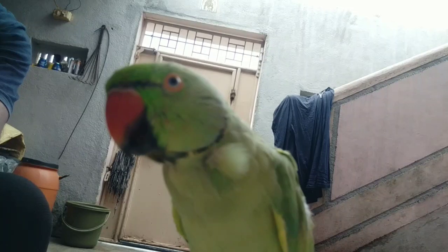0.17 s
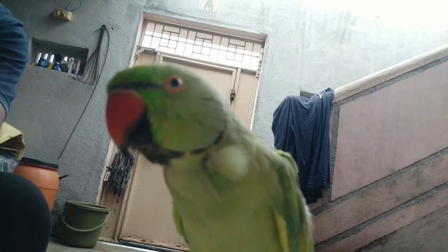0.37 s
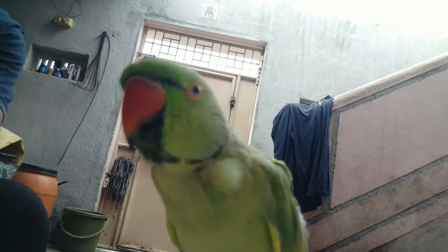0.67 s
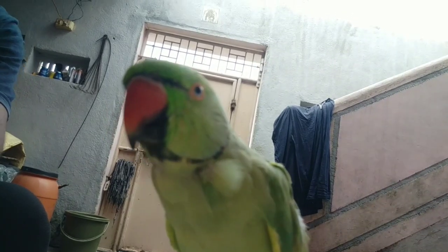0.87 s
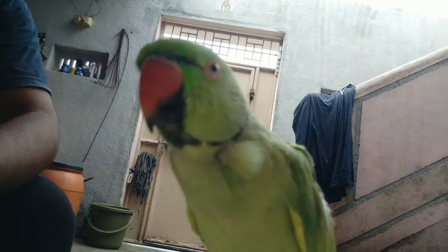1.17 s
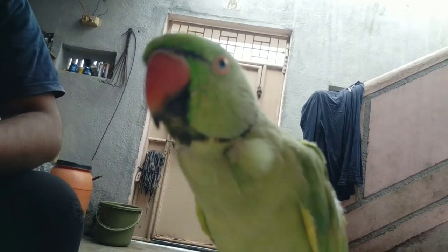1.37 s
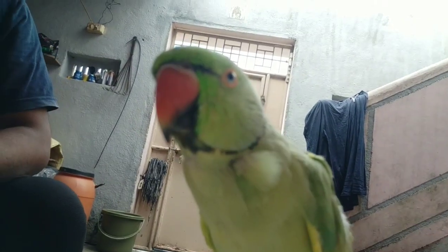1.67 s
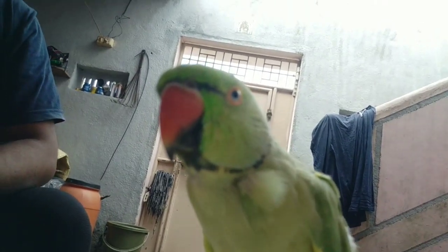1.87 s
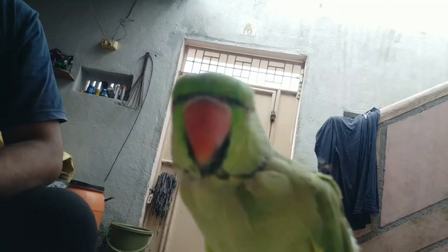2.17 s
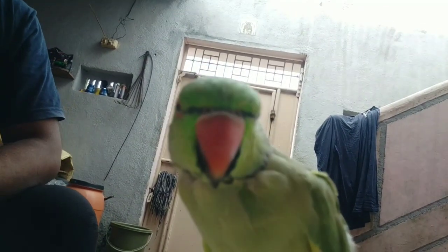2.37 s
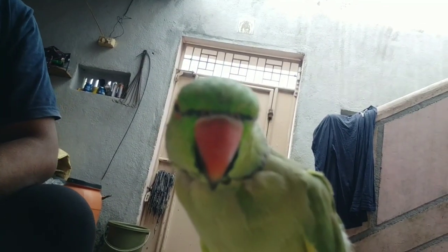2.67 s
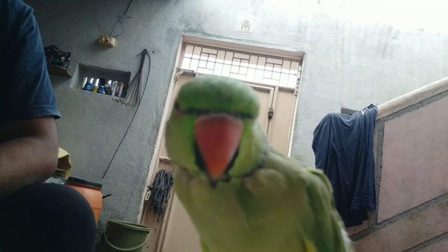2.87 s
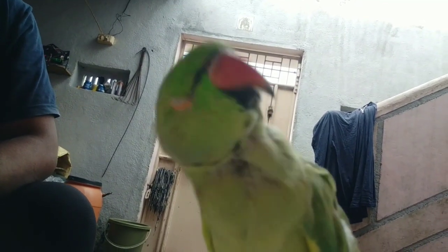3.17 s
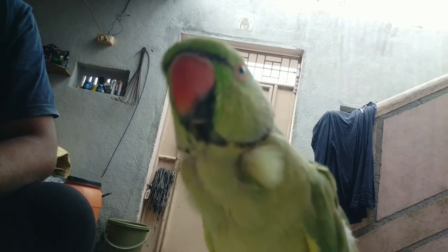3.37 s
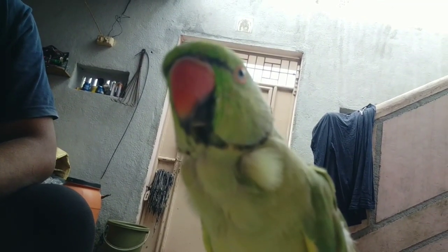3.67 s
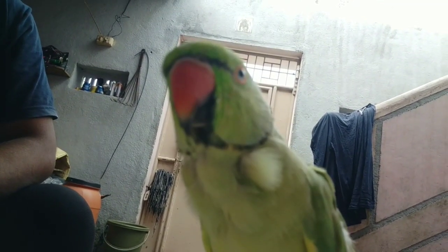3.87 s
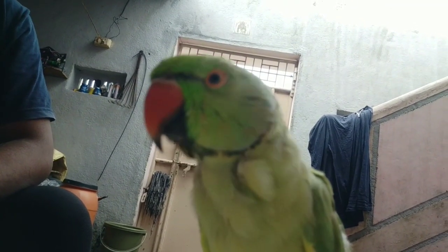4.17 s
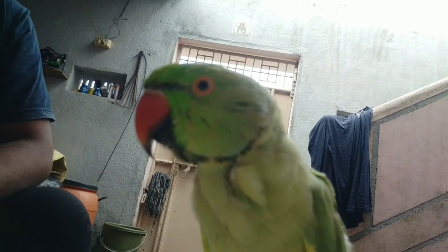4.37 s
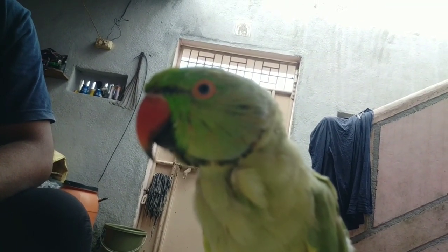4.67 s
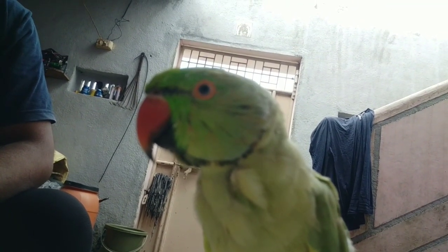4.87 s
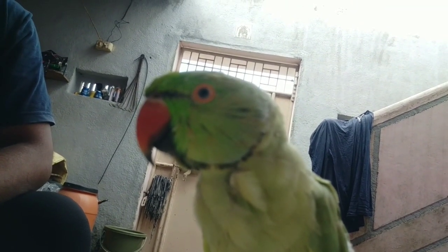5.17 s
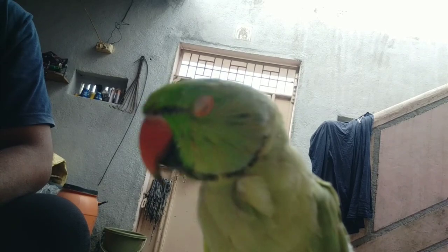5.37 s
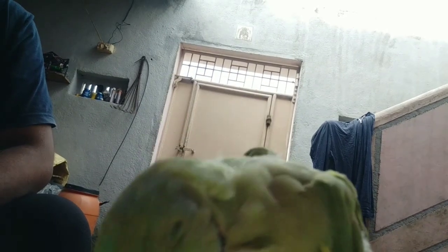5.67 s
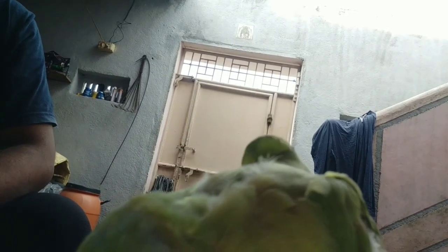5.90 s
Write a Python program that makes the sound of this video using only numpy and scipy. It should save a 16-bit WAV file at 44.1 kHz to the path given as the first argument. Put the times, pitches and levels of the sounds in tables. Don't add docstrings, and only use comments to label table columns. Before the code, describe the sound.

A parakeet very near a stereo phone microphone is caught mid-peep, then gives a dipping whistle, a small beak click, a loud rising whistle and a falling one, all within a second and a half. Airy puffs and short wall echoes surround them. Afterwards the walled yard is quiet: faint echoing sparrow chirps, slight rustling of cloth and feathers, soft low wind bumps, a far motor hum and distant traffic under thin hiss.

```python
import sys
import numpy as np
from scipy import signal
from scipy.fft import rfft, irfft
from scipy.io import wavfile
from scipy.ndimage import uniform_filter1d

SR = 44100
rng = np.random.default_rng(int(sys.argv[2]) if len(sys.argv) > 2 else 0)


def generate_wav(sig):
    pcm = np.round(np.clip(np.atleast_2d(sig).T, -1, 1) * 32767).astype(np.int16)
    wavfile.write(sys.argv[1], SR, pcm)


def volts_from_decibels(level):
    exponent = np.asarray(level, float) / 20
    return 10 ** exponent


N = 266143
T, HZ = np.arange(N) / SR, np.arange(N // 2 + 1) * SR / N

# time in seconds, pitch in Hz, level in dB,
# beak opening (about 0 shut to 1 wide), membrane slap in dB relative to the level.
PEEP = [
    (.045, 1012, -25, 0.53, 4),
    (.064, 978, -20, 1.27, 5),
    (.082, 984, -18, 1.134, 3.5),
    (0.098, 1015, -23, 0.99, 3),
    (0.107, 978, -25, 1.1, 5.5),
    (0.113, 956, -30, 1.2, 5),
]
DIP = [
    (0.191, 1374, -21.5, 0.96, -3.5),
    (.214, 1119, -21.5, 1.12, -2.5),
    (0.251, 952, -21, 1, -11),
    (0.304, 869.7, -18.5, .88, -33),
    (0.326, 878, -20.5, .32, -39),
    (0.387, 895.3, -16.5, 0.11, -26.5),
    (0.411, 1022, -15, 0.072, -26),
    (0.421, 1316, -18, 0.1, -41),
    (0.442, 1365, -19, 0.1, -40),
]
RISE = [
    (0.811, 1183, -41, 0.13, -29.5),
    (0.828, 1158, -26, 0.18, -40.5),
    (.868, 1301, -22, .1, -34),
    (0.896, 1477, -26, 0.15, -9),
    (.909, 1654, -21.5, 0.77, -14.5),
    (.922, 1802, -12.5, 0.7, -18),
    (0.937, 1926, -10, 0.85, -12.5),
    (.948, 2136, -13.5, 0.74, -18),
    (0.957, 2245, -15.5, 0.3, -28.5),
]
FALL = [
    (1.1, 1600, -32, 0.37, -36),
    (1.172, 1572, -29, 0.4, -12.5),
    (1.255, 1635, -17.5, .4, -16),
    (1.305, 1642, -17.5, 0.45, -15),
    (1.33, 1598, -19, 0.36, -14),
    (1.355, 1521, -15, 0.3, -16.5),
    (1.405, 1102, -16, 0.34, -19),
    (1.428, 987, -15, 0.41, -29),
    (1.441, 981, -21, 0.35, -30.5),
]
ATTACK_S, ATTACK_DB, RELEASE_S, RELEASE_DB = .011, -12.5, 0.013, -11.5
MEMBRANE_DB = [-62, -52.5, -47, -48]
SECOND_PARTIAL_DB = [-2, 1.2, -5.5, -1]
HOARSENESS = [1.15, .86, .72, .72]
ROUGH_PER_DB = .036
MEMBRANE_HZ, MEMBRANE_PULL = 240, .08
# frequency in Hz, gain in dB.
WINDPIPE_SECOND = [(1700, -2.5), (2050, 5.5), (2350, 3), (2750, -8), (3250, -18), (3600, -18.5),
                   (3850, -14), (4150, -27.5)]
# frequency in Hz, gain in dB.
WINDPIPE_THIRD = [(2600, 1), (2800, 3), (3150, -4.5), (3700, 0.8), (4200, -1.5), (5000, 0), (5800, -1.4),
                  (6600, -2.5)]
# shut share (about 0 open to 1 shut, may go
# beyond), gain in dB.
SECOND_SHUT = [(.35, -0.5), (.7, -11), (1.2, -20)]
THIRD_OPEN_DB, THIRD_SHUT_DB = 7.5, -44
CLOSING = .4
RASP_DB = -25
# frequency in Hz, gain in dB.
THROAT_WIDE = [(3000, 3), (4000, 14), (5000, -4.5), (6000, 3), (7000, -0.5), (8000, 0.5), (9000, -20),
               (11000, -25), (15000, -41.5)]
# frequency in Hz, gain in dB.
THROAT_RAISED = [(3700, -1), (4160, 10), (4900, -4.5), (5550, 3), (6240, -5), (7400, 7.5), (8300, 4),
                 (9400, -21), (15000, -40.5)]
# frequency in Hz, gain in dB.
THROAT_STRETCHED = [(4500, -5.5), (6000, 9.5), (6800, 9.5), (7400, -1), (8200, 6), (9400, -2), (11200, 9),
                    (12200, -7), (15500, -22.5)]
# frequency in Hz, gain in dB.
THROAT_LOWERED = [(3000, 10.5), (4500, -7), (6300, 7), (7300, -9.5), (8000, 3.5), (10000, 0), (11500, 1.5),
                  (13000, -6.5), (15500, -27)]
# peak in seconds, rise in seconds, fall in seconds
# (each spans 20 dB), level in dB.
PUFFS = [
    [(.09, 0.036, 0.098, -40.5), (.193, 0.0086, 0.086, -35), (.24, 0.081, 0.088, -47.5),
     (.4, .04, 0.064, -43), (.443, 0.1, .014, -42)],
    [(0.4, 0.011, 0.55, -64), (1.05, 0.46, 0.23, -47), (1.17, .2, 0.21, -48), (.88, 0.065, .06, -50),
     (.94, 0.14, .05, -40.5), (1.39, .1, 0.07, -41), (1.44, 0.11, .014, -48.5)],
]
# frequency in Hz, gain in dB.
AIR_RAISED = [(800, -39.5), (2000, -13), (3500, -2), (5700, -12), (8000, -6), (11000, -2.5), (12500, -14),
              (15000, -26)]
# frequency in Hz, gain in dB.
AIR_LOWERED = [(800, -20.5), (1500, -11), (2600, -1), (4000, -6.5), (5500, -6.5), (7500, -0.5), (11000, -3),
               (12500, -1.5), (15000, -8.5)]
BEAK_S = .6457
# frequency in Hz, level in dB, decay by 60 dB in seconds.
BEAK_MODES = [(750, -38, 0.019), (2174, -29, 0.01), (2980, -33.5, 0.0029), (4740, -41.5, 0.0018),
              (8000, -16, 0.0043), (10770, -31, .004)]
# frequency in Hz, left minus right in dB, lead of the left in radians.
HEAD_RAISED = [(0, 0, 0), (890, 5, .35), (1000, 4, 0), (1350, 12, -.25), (1760, 18, -1.8), (2200, 13, -2.7),
               (2430, 2, -3.25), (3000, 6, -3.45), (4000, -1, -4.1), (4400, -5, -4.9), (6000, -1, -5.8),
               (8000, -1, -5.7), (9000, 5, -8.5), (15000, 0, -14)]
# frequency in Hz, left minus right in dB, lead of the left in radians.
HEAD_STRETCHED = [(0, 0, 0), (1000, 6, -.5), (1400, 18, -.9), (1520, 13, -1.9), (1700, 6, -2.2),
                  (2150, 8, -2.5), (2900, 1, -3.15), (3800, 1, -3.3), (5100, -5, -5.3), (6100, 0, -5.6),
                  (6800, 6, -5.6), (7500, 5, -8.6), (8300, -10, -7.5), (9300, -7, -9.1), (11200, 0, -8.6),
                  (15000, 0, -12)]
# frequency in Hz, left minus right in dB, lead of the left in radians.
HEAD_LOWERED = [(0, 0, 0), (1000, 4, -.4), (1340, 13, -.9), (1620, 6, -2.4), (2100, 6, -2.9), (2650, 5, -4),
                (3280, 4, -5.5), (4920, -1, -6.2), (6560, -1, -6.7), (8200, -10, -10.1), (9850, -6, -11.4),
                (11500, -3, -10.8), (13100, 10, -14.4), (15000, 4, -16)]
ECHO_BLUR = .6
# start in seconds, length in seconds, start pitch in Hz, level in dB.
CHIRPS = [(1.58, 0.077, 7350, -54.5), (2.001, 0.071, 6570, -56), (2.422, 0.075, 7470, -52.5),
          (2.556, 0.056, 6130, -64), (2.845, 0.089, 7560, -52.5), (3.1, 0.041, 6670, -58),
          (3.577, 0.059, 7380, -49.5), (3.661, 0.088, 5930, -62.5), (3.988, 0.024, 7130, -49.5),
          (4.18, 0.054, 6220, -62), (4.372, 0.042, 6910, -52.5), (4.474, 0.036, 7100, -49),
          (4.696, 0.045, 6050, -59.5), (4.754, 0.058, 6870, -51), (5.161, 0.059, 7140, -50),
          (5.574, 0.061, 6910, -52.5), (5.654, 0.069, 5100, -61.5)]
CHIRP_FALL = .23
# centre in seconds, length in seconds,
# centre frequency in Hz, width in octaves, level in dB.
RUSTLES = [(2.37, 0.15, 7000, 1.12, -53), (2.603, 0.052, 9600, 1.2, -53), (2.742, 0.0093, 8300, 1.2, -61),
           (3.284, 0.1, 8300, 0.81, -51.5), (3.377, 0.14, 6100, 0.69, -57.5),
           (3.753, 0.17, 2600, 0.48, -59), (3.884, 0.15, 5000, 1.45, -52.5),
           (4.476, 0.23, 2700, 0.82, -55.5), (4.6, 0.21, 2900, 0.54, -64), (3.223, 0.22, 3440, 0.46, -59),
           (5.137, 0.25, 4200, 0.71, -57), (5.455, 0.19, 7970, 0.1, -65.5), (5.952, 0.075, 3400, 0.25, -65),
           (2.5, 0.25, 1600, 1.2, -60), (5.625, 0.043, 2400, 0.21, -62.5), (5.757, 0.013, 8460, 0.36, -57),
           (1.073, 0.07, 760, 1.15, -43), (1.171, 0.057, 810, 0.19, -44.5),
           (0.493, 0.054, 208, 0.17, -50.5), (0.59, 0.2, 22, 0.32, -48), (1.7, 0.19, 37.5, 0.14, -54),
           (2.7, 0.15, 38, 0.41, -48), (5.848, 0.14, 69, 0.59, -50), (0.081, 0.024, 290, .9, -37)]
# frequency in Hz, density in dB per Hz.
YARD = [(12, -37.5), (20, -2), (59, -6), (99, -5.5), (326, -20.5), (480, -17.5), (633, -23), (1070, -26.5),
        (3610, -26), (4630, -29), (6280, -28), (7210, -29), (8060, -30), (14800, -35)]
YARD_DB = -53
# frequency in Hz, likeness (0-1).
ALIKE = [(30, .8), (60, .9), (130, .86), (290, .7), (640, .42), (1400, 0), (15000, 0)]
# start in seconds, end in seconds, start and end pitch in Hz, level in dB.
MOTOR = [
    (2.585, 5.07, 106, 104, -56),
    (0.5, 1.14, 105, 110, -59.5),
    (3.6, 5.3, 150, 160, -62.5),
    (4.75, 5.35, 685, 665, -67),
    (4.8, 2.2, 250, 200, -60.5),
]
MOTOR_WANDER_HZ = 2.7
START_S = .0826
TOP_HZ = 15550


def level(x, db):
    return x * volts_from_decibels(db) / np.sqrt(np.mean(x ** 2))


def shaped(gain, channels=2):
    return level(irfft(rfft(rng.standard_normal((channels, N))) * gain, N), 0)


def colour(points):
    hz, db = np.transpose(points)
    return volts_from_decibels(np.interp(np.log(HZ + 1), np.log(hz), db))


def walk(rate, count=N):
    k = int(SR / rate)
    steps = np.repeat(rng.standard_normal(count // k + 1), k)
    return 1.3 * uniform_filter1d(uniform_filter1d(steps, k), k)[:count]


def curve(s, values, outside):
    return uniform_filter1d(np.interp(T, s, values, outside, outside), size=180)


def ports(x, head):
    hz, db, lead = np.transpose(head)
    half = volts_from_decibels(np.interp(HZ, hz, db) / 2) * np.exp(.5j * np.interp(HZ, hz, lead))
    return irfft(rfft(x) * np.array([half, 1 / half]), N)


def walls(x, t60, first_s, swell_s, thin_hz, dull_hz):
    t = T[:SR]
    fade = np.exp(-np.log(1000) * t / t60)
    tail = rng.standard_normal((2, SR)) * fade * np.clip((t - first_s) / swell_s, 0, 1)
    tail = signal.lfilter(*signal.butter(1, [thin_hz, dull_hz], "band", fs=SR), tail)
    tail /= np.sqrt(np.sum(tail ** 2) / 2)
    return signal.fftconvolve(x[None], tail, axes=1)[:, :N]


def parakeet():
    up_db, down_db = map(breath_db, PUFFS)
    tunes = PEEP, DIP, RISE, FALL
    throats = THROAT_WIDE, THROAT_RAISED, THROAT_STRETCHED, THROAT_LOWERED
    breaths = up_db, up_db, down_db, down_db
    settings = zip(tunes, throats, MEMBRANE_DB, SECOND_PARTIAL_DB, HOARSENESS, breaths)
    peep, dip, rise, fall = [whistle(*setting) for setting in settings]
    air_up, air_down = air(up_db, AIR_RAISED), air(down_db, AIR_LOWERED)
    raised = peep + dip + beak_click() + air_up[0]
    lowered = fall + air_down[0]
    scattered = volts_from_decibels(10.0) * (air_up + air_down)[1:]
    direct = ports(raised, HEAD_RAISED) + ports(lowered, HEAD_LOWERED) + ports(rise, HEAD_STRETCHED)
    shaken = (raised + lowered + rise) * (1 + ECHO_BLUR * walk(220))
    echo = walls(shaken, 0.54, 0.009, .02, 700, 4400)
    return volts_from_decibels(1.5) * direct + scattered + volts_from_decibels(-21.0) * echo


def whistle(rows, throat, membrane_db, second_db, hoarse, air_db):
    s, hz, first, beak, slap = np.transpose([rows[0], *rows, rows[-1]])
    s[0], s[-1] = s[0] - ATTACK_S, s[-1] + RELEASE_S
    first[0], first[-1] = first[0] + ATTACK_DB, first[-1] + RELEASE_DB
    hz[0] += (hz[1] - hz[2]) / (s[2] - s[1]) * ATTACK_S
    beak[0], slap[0] = beak[0] - .6, slap[0] - 25
    beak[-1] -= CLOSING
    pitch = uniform_filter1d(np.interp(T, s, hz), size=400) * (1 + 0.0027 * walk(90))
    turn = 2 * np.pi * np.cumsum(pitch) / SR
    shut = 1 - np.interp(T, s, beak)

    voice = curve(s, first, -120)
    second = voice + second_db + np.interp(2 * pitch, *np.transpose(WINDPIPE_SECOND))
    second += np.interp(shut, *np.transpose(SECOND_SHUT))
    third = voice + THIRD_OPEN_DB + THIRD_SHUT_DB * shut
    third += np.interp(3 * pitch, *np.transpose(WINDPIPE_THIRD))
    higher = voice + np.interp(T, s, slap)
    rough = np.clip(hoarse + ROUGH_PER_DB * (air_db - higher), .08, .85)

    chest = volts_from_decibels(-32.5) * rough * shaped(np.exp(-np.log2((HZ + 1) / 550) ** 2 / 2.4), channels=1)[0]
    tone = np.sin(turn) * (1 + 0.055 * walk(500))
    out = volts_from_decibels(voice) * (tone + 0.0052 * walk(3000) + chest)
    out += second_membrane(s, first, membrane_db, pitch, turn)
    out += volts_from_decibels(second) * (1 + 0.086 * rough * walk(480)) * np.sin(2 * turn + 1)
    out += volts_from_decibels(third) * (1 + .3 * rough * walk(500)) * np.sin(3 * turn + 2)
    out += volts_from_decibels(third + RASP_DB) * np.diff(walk(7000, N + 1)) * 4

    throat_hz, throat_db = np.transpose(throat)
    on = np.flatnonzero(voice > -100)
    for k in range(4, 16):
        db = higher[on] + np.interp(k * pitch[on], throat_hz, throat_db, right=-90) + 2 * walk(40, len(on))
        smear = (1 - rough[on]) ** 1.6 + 0.87 * rough[on] * walk(1500, len(on))
        out[on] += volts_from_decibels(db) * smear * np.sin(k * turn[on] + k * k)
    return out


def second_membrane(s, first, membrane_db, pitch, turn):
    slow = 2 * np.pi * MEMBRANE_HZ * T + MEMBRANE_PULL * turn
    hum = .1 * np.sin(slow) * (1 + .6 * walk(60))
    sides = np.sin(turn - slow) + .3 * np.sin(turn + slow) + hum
    db = curve(s, membrane_db + .45 * (first + 22), -120) + 2 * walk(25)
    return sides * volts_from_decibels(db + np.interp(pitch, [950, 1150], [-10, 0]))


def breath_db(puffs):
    power = 1e-14
    for s, rise, fall, db in puffs:
        power = power + volts_from_decibels(2 * (db + 20 * np.minimum((T - s) / rise, (s - T) / fall)))
    return 10 * np.log10(power)


def air(db, tone):
    return shaped(colour(tone), channels=3) * volts_from_decibels(db + 1.0 * walk(30))


def beak_click():
    t = np.maximum(T - BEAK_S, 0)
    out = np.zeros(N)
    for hz, db, t60 in BEAK_MODES:
        out += volts_from_decibels(db) * np.sin(2 * np.pi * hz * t) * np.exp(-np.log(1000) * t / t60)
    return out


def sparrows():
    out = np.zeros(N)
    hoarse = walk(500)
    for s, length, start_hz, db in CHIRPS:
        i, t = int(s * SR), np.arange(int(length * SR)) / SR
        hz = start_hz * (1 - CHIRP_FALL * t / length) + 240 * hoarse[i:i + len(t)]
        swell = np.sin(np.pi * t / length) * volts_from_decibels(3 * hoarse[i + 999:i + 999 + len(t)])
        out[i:i + len(t)] += volts_from_decibels(db) * swell * np.sin(2 * np.pi * np.cumsum(hz) / SR)
    return volts_from_decibels(-5) * out + volts_from_decibels(3.5) * walls(out, .46, 0.001, 0.016, 500, 9700)


def rustles():
    out = np.zeros((2, N))
    for s, length, hz, width, db in RUSTLES:
        i, n = int((s - length) * SR), int(2 * length * SR)
        f = np.arange(n // 2 + 1) * SR / n + 1
        noise = rng.standard_normal((2, n)) * volts_from_decibels(2.3 * rng.standard_exponential(n))
        alike = np.clip(150 / hz, 0, .9)
        noise[1] = alike * noise[0] + np.sqrt(1 - alike ** 2) * noise[1]
        burst = irfft(rfft(noise) * np.exp(-np.log2(f / hz) ** 2 / width ** 2), n)
        out[:, i:i + n] += level(burst, db) * np.hanning(n)
    return out


def motor():
    out = np.zeros(N)
    for start, end, start_hz, end_hz, db in MOTOR:
        hz = np.interp(T, [start, end], [start_hz, end_hz]) + MOTOR_WANDER_HZ * walk(12)
        on = uniform_filter1d(1. * ((T > start) & (T < end)), size=9000)
        out += volts_from_decibels(db + 3.0 * walk(8.5)) * on * np.sin(2 * np.pi * np.cumsum(hz) / SR)
    return out


def yard():
    hz, alike = np.transpose(ALIKE)
    alike = np.clip(np.interp(np.log(HZ + 1), np.log(hz), alike), 0, 1)
    mid, side = rfft(shaped(colour(YARD)))
    mid, side = mid * np.sqrt(1 + alike), side * np.sqrt(1 - alike)
    both = irfft(np.array([mid + side, mid - side]), N)
    return level(both, YARD_DB) * volts_from_decibels(0.38 * walk(1))


def scene():
    return parakeet() + sparrows() + rustles() + motor() + yard()


def dropouts(x, dip_db, masked_db):
    z = signal.stft(x, window="cosine", nperseg=2048, noverlap=1024)[2]
    power = (np.abs(z[:, :1024]) ** 2).sum(axis=0)
    power = power.reshape(128, 8, -1).mean(axis=1) + 1e-20
    usual = np.exp(uniform_filter1d(np.log(power), size=7, axis=0))
    around = uniform_filter1d(power, size=11, axis=0)
    keep = (power > usual * volts_from_decibels(2 * dip_db)) & (power > around * volts_from_decibels(2 * masked_db))
    keep[:12] = True
    keep[78:] &= power[78:] > power[4:].max(axis=0) * volts_from_decibels(2 * -48)
    z[:, :1024] *= np.where(np.repeat(keep, 8, axis=0), 1, .04)
    return signal.istft(z, window="cosine", nperseg=2048, noverlap=1024)[1][:, :N]


def low_pass(x):
    return signal.sosfilt(signal.butter(12, 16690, fs=SR, output="sos"), x)


def record(dry):
    rounded = dry / (1 + np.abs(dry / .8) ** 6) ** (1 / 6)
    x = dropouts(rounded, -1.1, -28)
    x = signal.sosfilt(signal.ellip(8, .3, 45, TOP_HZ, fs=SR, output="sos"), x)
    mix = x * np.clip((T - START_S) / 0.00078, 0, 1)
    return low_pass(mix)


dry = scene()
out = record(dry)
generate_wav(out)
```